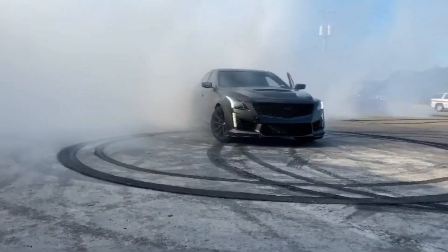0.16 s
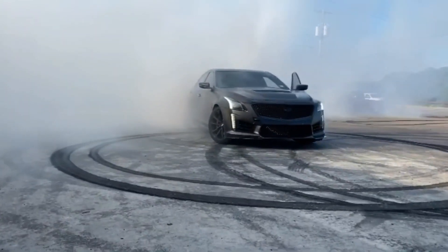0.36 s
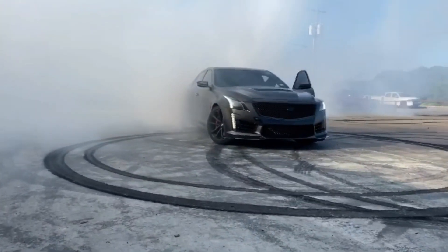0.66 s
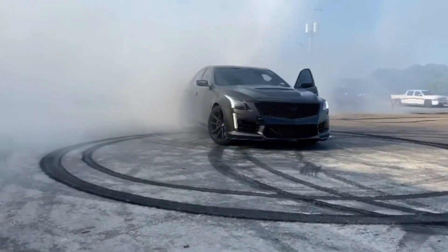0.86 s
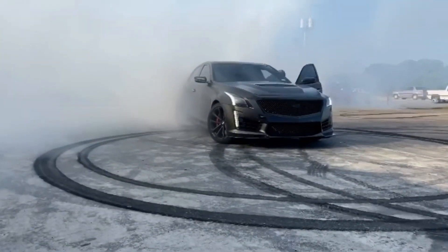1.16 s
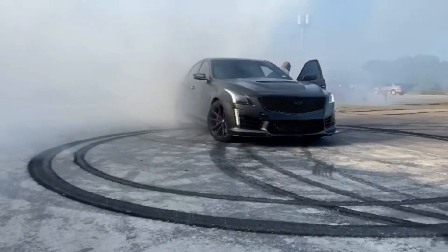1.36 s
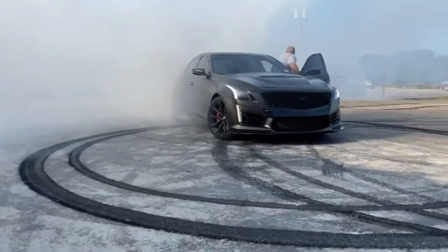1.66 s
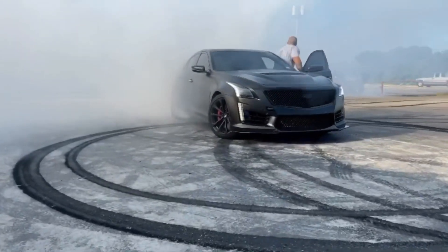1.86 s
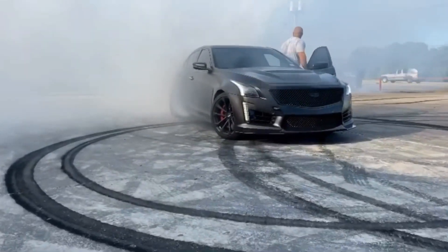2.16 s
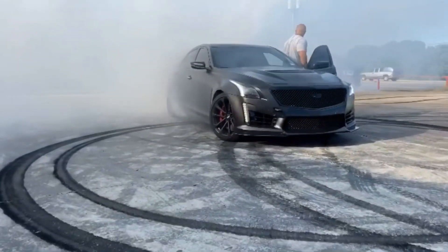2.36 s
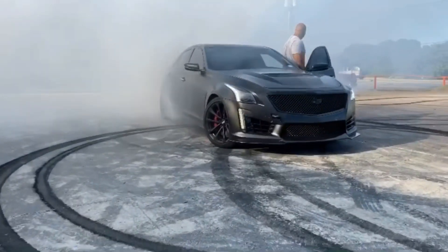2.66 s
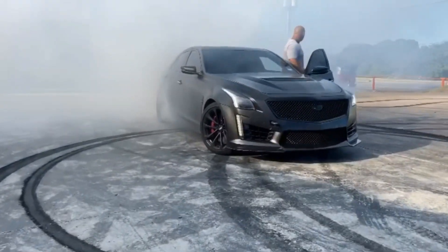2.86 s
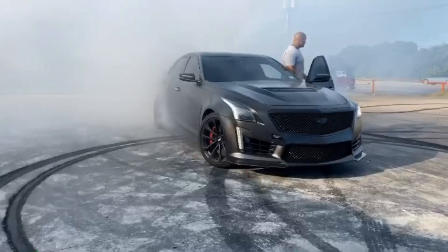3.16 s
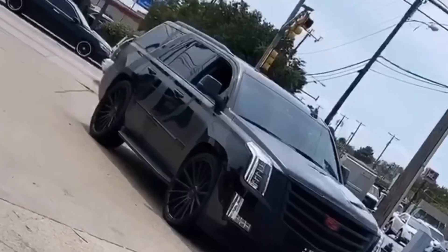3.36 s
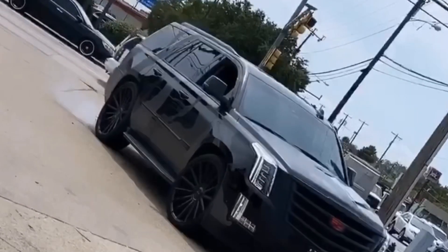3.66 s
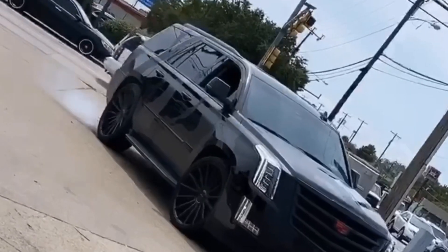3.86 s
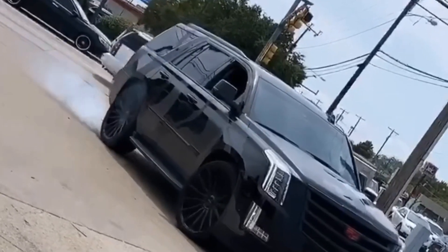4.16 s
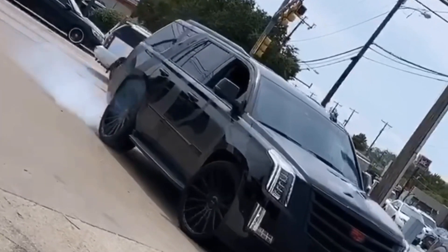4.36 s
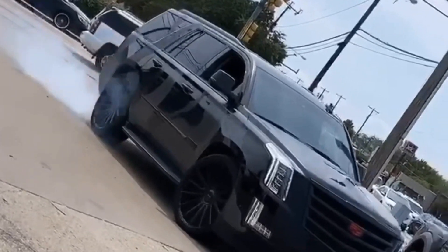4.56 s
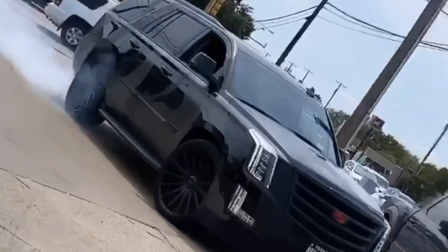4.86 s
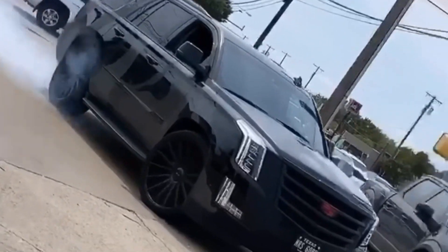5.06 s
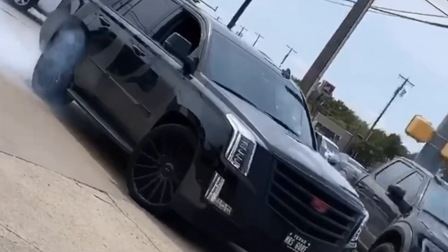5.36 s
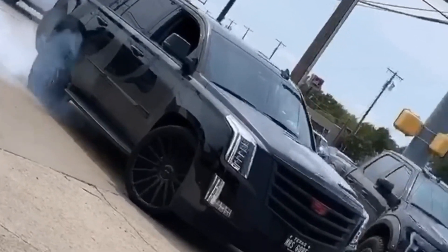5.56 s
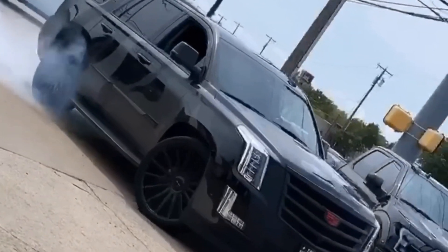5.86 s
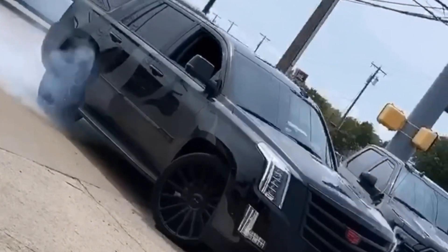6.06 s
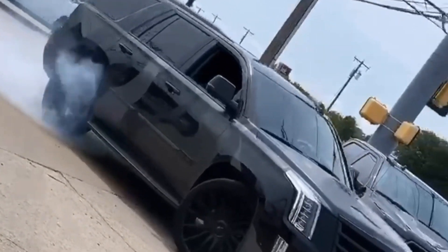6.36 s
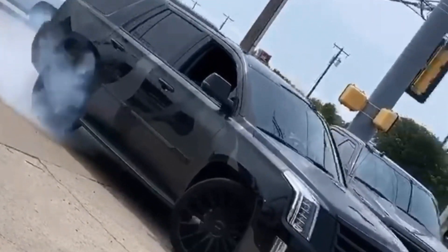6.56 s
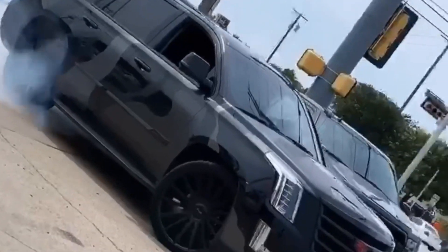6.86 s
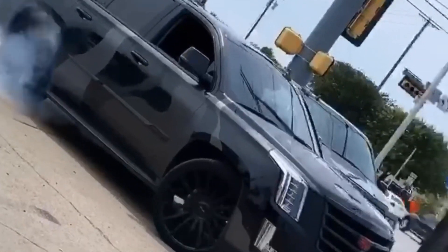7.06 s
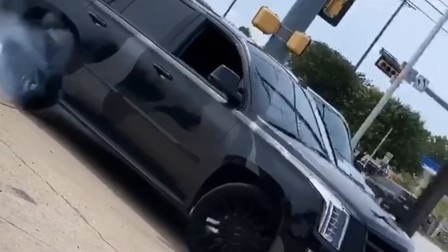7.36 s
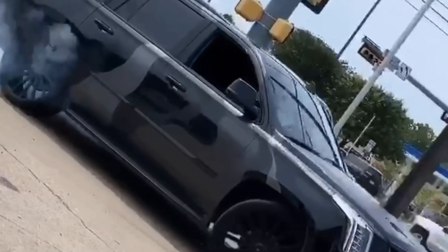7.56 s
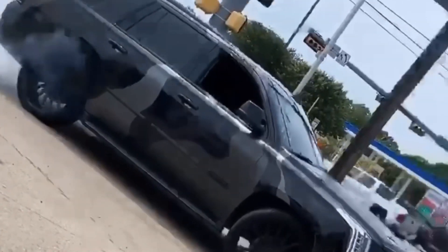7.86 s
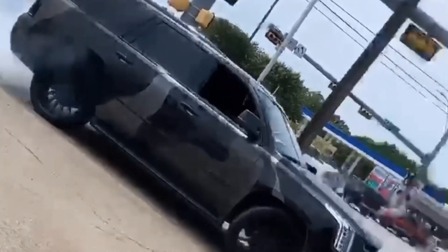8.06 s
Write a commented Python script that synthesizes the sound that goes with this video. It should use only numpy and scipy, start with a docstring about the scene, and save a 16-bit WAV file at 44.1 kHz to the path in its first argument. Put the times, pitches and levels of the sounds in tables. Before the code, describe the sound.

First a soft, bassy, lumpy idle in wide stereo, drawing nearer, with a few faint ticks. After a tiny gap, a loud, centred street burnout bursts in: rough tyre chirps around a rising, raspy V8 note, a crackling gear change with a sharp pitch drop, steady growling and hissing wheelspin, then throttle closed and a quiet low burble over faint street noise, with light hiss at the end.

```python
"""A V8 SUV does a burnout on a street: tyres chirp and squeal, revs climb, the gearbox shifts up, the wheels
spin on with a hiss, then the throttle closes to a deep burble. Engine: sine orders of the cycle rate plus
firing-pulsed noise; tyres: swept harmonic tones and filtered noise. Before it, and a short silence, a V8
saloon lopes at idle: uneven firing pulses ring its exhaust, with valve rustle and belt hum."""
import sys
import numpy as np
from scipy import signal
from scipy.fft import rfft, irfft
from scipy.io import wavfile
from scipy.ndimage import uniform_filter1d, minimum_filter1d, map_coordinates

SR = 44100
rng = np.random.default_rng(int(sys.argv[2]) if len(sys.argv) > 2 else 0)


def wrap_up_sound(samples):
    """Save the sound to the file named by the first command line argument, as 16-bit audio."""
    columns = np.atleast_2d(samples).T
    # keep every value between -1 and 1, then stretch to whole-number steps
    tamed = np.clip(columns, -1, 1)
    steps = np.round(tamed * 32767).astype(np.int16)
    wavfile.write(sys.argv[1], SR, steps)


N = 361821
T = np.arange(N) / SR
SALOON_END_S, SUV_START_S = 3.08, 3.242
TOP_HZ = 15750

# SUV engine speed. Each row: time in seconds, engine cycles in Hz.
SUV_REVS = [(3.25, 28.2), (3.42, 31), (3.93, 42.1), (4.22, 46.7), (4.38, 47.9), (4.52, 46.7), (4.7, 31.3),
            (4.79, 29.3), (5.1, 29.2), (5.44, 28.7), (5.98, 29.35), (6.274, 27.4), (6.458, 26.6),
            (6.6, 24.8), (6.78, 19.8), (6.93, 12), (7.07, 10.2), (7.27, 9.3), (7.5, 11), (7.68, 10.1),
            (8.2, 11.4)]
# Throttle, part open until about 5.3 s, then full, and closed at the end; each layer takes its own share of the
# dB. # Each row: time in seconds, level in dB.
THROTTLE = [(4.68, -4.5), (4.8, -3.5), (5.3, -3.5), (5.42, 0), (5.87, -0.5), (6.65, -3), (6.87, -14.5),
            (6.96, -29), (7.15, -31.5), (7.4, -37)]
# Strain at the launch, up the revs, at the upshift, as the tyres bite again and as it rolls on.
# Each row: start in seconds, end in seconds, then dB added to exhaust beat, rasp, tyre hiss, uneven combustion.
STRAINS = [(3.147, 3.574, 6.5, 6, 7, 11), (3.587, 4.524, 1.5, 4, 1.5, -1.5), (4.515, 4.722, 3.5, 7, 3.5, 8),
           (6.116, 6.925, 1, 0, -1, 6), (7.85, 8.4, 1.5, 2.5, 1.5, 2.5)]
STRAIN_EDGE_S = 0.045
# Levels at full throttle without strain.
BEAT_DB, ROUGH_DB, RASP_DB, HISS_DB = -1.7, -43.5, -27, -44.5
SPIN_HZ = 27.9  # below this cycle rate the wheelspin hiss, beat and roughness sink
FIRING_ORDER = 8  # firings per engine cycle
FLUTTER_DB = 1.2  # unsteadiness of the firing tone
# Pipe resonances the firing tone sweeps through. Each row: frequency in Hz, level in dB.
FIRING_PIPE = [(70, -16), (80, -16.5), (88, -16), (100, -23), (125, -31), (163, -23.5), (192, -32),
               (207, -25.5), (224, -28.5), (236, -38.5), (252, -23.5), (280, -20), (310, -28), (335, -37),
               (358, -26.5), (374, -25)]
# Orders filled in by the uneven firing of the two banks.
# Each row: multiple of the cycle rate, level in first gear in dB, level in second gear in dB.
BEAT_ORDERS = [(2, -5, -5), (3, 4, 3.5), (4, -2.5, -1.5), (5, 4, -2), (6, -5.5, 7.5), (7, 2.5, -1.5),
               (9, 10.5, 1.5), (10.03, 5.5, 8.5), (11, 11, 5), (12, -3, -17), (13, 1.5, 0.5), (14, 4.5, 1),
               (15, -7, 5), (16, 8, 6.5), (17, 6.5, -21), (18, 1, -1.5), (19, 2.5, 6.5), (20, 1.5, -18),
               (22, 3.5, -20), (23, 2, 1), (24, 3.5, 0.5), (26.1, 4, -0.5), (27, 0, 4.5), (28, 5.5, -2),
               (29, 8, 0.5), (32, 2, -3), (33, -15, -0.5), (35, -4, 3.5), (40, -11, 4.5)]
# Three blasts stand out in each engine cycle. Each row: place in the cycle from 0 to 1, relative size.
BLASTS = [(0, 1), (.345, .9), (.64, .8)]
# SUV exhaust response to the beat. Each row: frequency in Hz, level in dB.
SUV_PIPE = [(30, -62.5), (58, -36), (86, -30.5), (118, -40.5), (145, -40.5), (175, -35.5), (205, -35),
            (250, -54.5), (290, -39), (335, -48), (380, -40), (480, -48.5), (590, -51.5), (650, -51.5),
            (700, -38), (745, -51.5), (795, -37), (850, -47), (910, -37), (955, -51), (1010, -38),
            (1070, -45), (1130, -51.5), (1230, -44), (1400, -44.5)]
# Exhaust response to the rumble. Each row: frequency in Hz, level in dB.
RUMBLE_PIPE = [(35, -20.5), (55, 0.5), (110, -2), (145, 1.5), (180, -2.5), (215, 2), (245, -10.5),
               (290, -5.5), (450, -20.5)]
UPSHIFT_S, UPSHIFT_LENGTH_S = 4.66, 0.2
BARK_S, BARK_RISE_S, BARK_DB = 5.75, 0.08, 2.5  # as the load grows, the tenth and higher orders come forward
# Cylinders in firing order, used for both engines. Each row: strength in dB, lateness in firing intervals.
CYLINDERS = [(-2, 0), (1.5, 0.079), (1, -0.047), (1.5, 0.072), (-6, -0.021), (2.5, -.04), (-2.5, 0.078),
             (4, -0.042)]
# Weak or strong runs of firings. Each row: start in seconds, end in seconds, level change in dB.
STUMBLES = [(0.08, 0.178, -2.5), (0.563, 0.627, -1.5), (1.7, 1.97, 1), (2.042, 2.14, -2.5),
            (2.62, 2.78, 0.5), (2.788, 2.853, -5.5), (7.2, 7.318, -8), (7.373, 7.612, -10),
            (7.532, 7.567, -8), (7.8, 8.12, 1.5), (7.966, 8.054, -8.5), (8.125, 8.157, -13)]
STUMBLE_EDGE_S = .04
# Engine rasp response. Each row: frequency in Hz, level in dB.
RASP = [(200, -9), (420, 2), (590, -9.5), (700, -0.5), (800, 2), (920, 7), (1110, 4.5), (1280, -2.5),
        (1600, -1.5), (2050, -1), (2500, -5), (2950, -9.5), (3380, -25), (6000, -31.5)]
# Intake resonances. Each row: frequency in Hz, level in dB.
HOWL = [(640, -70), (830, -33), (895, -23.5), (938, -34.5), (975, -28), (997, -22.5)]
# Orders that howl. Each row: multiple of the cycle rate, level in dB.
HOWL_ORDERS = [(21, 0), (23, -7)]
HOWL_TOP_HZ = 1020
# Exhaust crackles through the upshift. Each row: start in seconds, noise envelope peak in dB before the ring.
POPS = [(4.561, -10), (4.583, -14), (4.597, -13), (4.619, -12), (4.635, -15), (4.656, -14), (4.679, -16)]
# Ring of a pop. Each row: frequency in Hz, level in dB.
POP_RING = [(150, -4), (340, 15.5), (590, 2), (910, 17), (1300, 10.5), (1900, 2), (2900, -27), (3500, -35)]
POP_DECAY_S = 0.0059
# Tyre squeals. Each row: start in seconds, length in seconds, first pitch in Hz, last pitch in Hz,
# level in dB, nominal octave level in dB relative to the tone.
SQUEALS = [(3.253, 0.14, 1005, 1035, -25, -10.5), (3.425, 0.11, 1018, 1000, -32.5, 10),
           (3.429, 0.088, 1103, 1083, -15.5, -13), (3.539, 0.088, 1051, 1042, -12, -10),
           (3.622, 0.06, 1050, 1052, -25.5, -4), (3.675, 0.035, 1052, 1050, -13.5, -10.5),
           (3.768, 0.026, 1100, 1085, -19, -20), (3.793, 0.044, 1046, 1022, -16.5, -12.5),
           (4.572, 0.032, 923, 900, -19.5, -17), (5.83, 0.24, 1497, 1490, -38, -21)]
# Harmonics 1 to 4 of a squeal. Each row: level offset in dB, flutter in dB.
SQUEAL_PARTS = [(-1.2, 1.4), (-2, 2.7), (-27.5, 3.8), (-31, 2.9)]
# Tread scrub as it breaks loose. Each row: frequency in Hz, level in dB.
SKID = [(950, -7), (1270, 5.5), (1550, -7), (2150, -3.5), (2450, -7), (2900, -16)]
SKID_START_S, SKID_END_S, SKID_DB = 3.34, 3.57, -26.5
# Hiss of the spinning tyres. Each row: frequency in Hz, level in dB.
HISS = [(2500, 0.5), (3400, -2.5), (4000, -5.5), (5370, -5), (5910, -1), (6460, -5), (6970, -4),
        (8500, -8.5), (9690, -11), (10700, -24), (11700, -17), (15500, -21.5)]
# Thin hiss as the SUV rolls on. Each row: frequency in Hz, level in dB.
SIZZLE = [(4800, -21), (6000, 2), (7000, -5), (8800, 3), (9700, -9.5), (10600, -13), (15000, -12)]
# Soft drone as the SUV rolls on. Each row: frequency in Hz, level in dB.
DRONE = [(600, -19), (830, 10), (950, -9), (1250, -16)]
ROLL_ON_S, ROLL_RISE_S, SIZZLE_DB, DRONE_DB = 7.73, 0.22, -65, -58

# Saloon engine speed at idle. Each row: time in seconds, engine cycles in Hz.
LOPE = [(0, 6.68), (.35, 6.53), (.7, 6.53), (1.1, 6.76), (2.65, 6.6), (3.1, 6.72)]
# Saloon exhaust response. Each row: frequency in Hz, level in dB.
SALOON_PIPE = [(25, -55), (40, -12), (52, -7), (68, 3), (84, -0.5), (94, 2), (106, 6.5), (122, 2), (143, 3),
               (162, -8), (230, -20), (400, -22), (800, -45)]
# Engine bay response. Each row: frequency in Hz, level in dB.
BAY = [(170, -11), (350, -7), (470, -5), (780, -6.5), (1050, -15), (1900, -18), (2500, -23.5),
       (3000, -29.5), (4500, -29.5), (5600, -36), (8500, -39.5), (10500, -31), (13000, -45)]
# Belt drive tones. Each row: frequency in Hz, level in dB.
BELT = [(322, 2), (440, -2), (458, -1.5)]
# Levels at 0 s; the saloon grows louder as the listener walks up to it.
SALOON_DB, BAY_DB, BELT_DB = -39, -56, -64.5
APPROACH_DB_PER_S, BAY_DB_PER_S = 2, 2.5
# Faint ticks by the saloon. Each row: start in seconds, noise envelope peak in dB before the ring.
TICKS = [(1.9718, -50), (2.7544, -46), (2.9155, -47), (2.9524, -47)]
# Ring of a tick. Each row: frequency in Hz, level in dB.
TICK_RING = [(400, 7), (700, 4), (2000, -9), (4200, -5), (5500, -9)]
TICK_DECAY_S = .004

# Street background. Each row: frequency in Hz, level in dB.
STREET = [(30, 7.5), (100, 4), (200, -6), (330, -7), (480, -10.5), (580, -4), (700, -12), (860, -6),
          (1200, -18.5), (2500, -25.5), (4000, -58)]
STREET_DB = -51.0


def suv():
    """Engine, tyres and street in mono; throttle, revs and strain drive the engine and hiss levels."""
    cycle_hz, throttle_db = curves(SUV_REVS) + curves(THROTTLE)
    boom_db, snarl_db, scrub_db, uneven_db = strains()
    slowing_db = 20 * np.log10(np.minimum(cycle_hz / SPIN_HZ, 1))
    cycle = np.cumsum(cycle_hz) / SR
    firing_db = response(FIRING_PIPE, FIRING_ORDER * cycle_hz) + 0.39 * throttle_db
    firing_db = firing_db + FLUTTER_DB * walk(30) + stumbles()
    beat_db = BEAT_DB + boom_db + 0.35 * throttle_db + 1.1 * slowing_db
    rough_db = ROUGH_DB + uneven_db + .45 * slowing_db
    rasp_db = RASP_DB + throttle_db + snarl_db
    hiss_db = HISS_DB + scrub_db + 0.43 * throttle_db + 1.25 * slowing_db
    # uneven burns shake the crank, which smears the upper lines
    turn = 2 * np.pi * (cycle + undb(.5 * rough_db - 32) * walk(60))
    engine = exhaust(cycle, turn, firing_db, beat_db, rough_db, throttle_db)
    engine = engine + intake(cycle, cycle_hz, turn, rasp_db)
    crackle = bursts(POPS, POP_DECAY_S, POP_RING)
    return engine + crackle + squeal() + skid() + tyre_hiss(hiss_db) + roll_on() + street()


def exhaust(cycle, turn, firing_db, beat_db, rough_db, throttle_db):
    """Firing tone, the two banks' uneven beat through the pipes, and rumble; beat duller off throttle."""
    tone = -np.sqrt(2) * np.cos(FIRING_ORDER * turn)
    beat = colour(np.sqrt(2) * bank_beat(turn, throttle_db), SUV_PIPE)
    return beat * undb(beat_db) + tone * undb(firing_db) + rumble(cycle) * undb(rough_db)


def bank_beat(turn, throttle_db):
    """Sum of engine orders whose phases line the low ones up on three blasts a cycle."""
    shifted = np.clip((T - UPSHIFT_S) / UPSHIFT_LENGTH_S + .5, 0, 1)
    bark_db = BARK_DB * np.clip((T - BARK_S) / BARK_RISE_S + .5, 0, 1)
    flicker_db = 1.5 - .6 * shifted  # more flicker before the upshift
    beat = 0
    for multiple, first_db, second_db in BEAT_ORDERS:
        order = round(multiple)
        db = first_db + shifted * (second_db - first_db) + bark_db * (multiple > 10)
        db = db + 0.0086 * multiple * throttle_db
        db = db + flicker_db * (1 + multiple / 20) * walk(24)
        lead = np.angle(sum(size * np.exp(-2j * np.pi * order * place) for place, size in BLASTS))
        trail = .011 * multiple ** 2  # the pipe lets the high orders trail behind
        beat = beat - undb(db) * np.cos(order * turn + lead - trail)
    return beat


def rumble(cycle):
    """No two burns are alike: random-sized pulses through silencer and pipe rumble between the lines."""
    burns = firings(cycle, scatter_db=-0.5, jitter=.05) * noise() / np.sqrt(np.gradient(cycle))
    return unit(colour(silencer(burns), RUMBLE_PIPE))


def intake(cycle, cycle_hz, turn, rasp_db, count=4):
    """Grainy noise rasp pulsing with the firings; orders howl where they meet the intake resonances."""
    gate = puffs(cycle, depth=.11, lump=.1) * undb(1.3 * walk(300))
    # each engine cycle partly repeats the ones before it, so wavering partials come and go
    share = .7
    fresh = noise()
    gas = sum(share ** k * np.interp(cycle - k, cycle, fresh) for k in range(count))
    rasp = unit(colour(gas * gate, RASP))
    howl = 0
    for order, db in HOWL_ORDERS:
        hz = order * cycle_hz
        level = undb(db + response(HOWL, hz) + walk(70)) * (hz < HOWL_TOP_HZ)
        howl = howl + np.sin(round(order) * turn) * level
    return rasp * undb(rasp_db) + np.sqrt(2) * howl


def squeal(edge_s=.018, sag_db=3.0):
    """Tread sticks and slips in short swelling bursts: rough tones, each overtone fluttering on its own."""
    out = np.zeros(N)
    wobble = 1 + .011 * walk(330) + .0035 * walk(70)
    parts = [undb(part_db + flutter_db * walk(170)) for part_db, flutter_db in SQUEAL_PARTS]
    for start, length, first_hz, last_hz, db, octave_db in SQUEALS:
        i = np.flatnonzero((T > start - edge_s) & (T < start + length + edge_s))
        t = T[i] - start
        hz = np.interp(t, [0, length], [first_hz, last_hz]) * wobble[i]
        turn = 2 * np.pi * np.cumsum(hz) / SR
        edges = np.clip(np.minimum(t, length - t) / edge_s + .5, 0, 1)
        grip = edges * undb(-sag_db * (2 * t / length - 1) ** 2)
        bite = undb(0.45 * (db + 8.0))  # a softer slip has weaker high overtones
        sizes = [1, undb(octave_db), bite ** 2, bite ** 3]
        wave = sum(part[i] * size * np.sin(k * turn) for k, (part, size) in enumerate(zip(parts, sizes), 1))
        out[i] += np.sqrt(2) * wave * grip * undb(db)
    return out + scatter(out)


def scatter(x):
    """Nearby cars and walls scatter the squeals and join them up: a decaying noise tail."""
    tail = (noise() * np.exp(-T / .025))[:SR // 5]
    return signal.fftconvolve(x, tail / np.linalg.norm(tail))[:N] * undb(-13)


def skid():
    """Tread scrubs as it breaks loose: a burst of filtered noise."""
    return unit(colour(noise(), SKID)) * span(SKID_START_S, SKID_END_S, STRAIN_EDGE_S) * undb(SKID_DB)


def tyre_hiss(hiss_db):
    """Spinning tyres hiss: filtered noise with a fine flicker."""
    return unit(colour(noise() * undb(0.47 * walk(120)), HISS)) * undb(hiss_db)


def roll_on():
    """A thin flickering hiss and a soft drone, both filtered noise, rise as the SUV rolls on."""
    rolling = np.clip((T - ROLL_ON_S) / ROLL_RISE_S, 0, 1)
    sizzle = unit(colour(noise(), SIZZLE)) * undb(SIZZLE_DB + 2.5 * walk(22))
    drone = unit(colour(noise(), DRONE)) * undb(DRONE_DB)
    return (sizzle + drone) * rolling


def saloon():
    """Idling car in stereo: exhaust, engine bay and belt drive, growing louder, with faint ticks."""
    cycle = np.cumsum(curves(LOPE)[0]) / SR
    near_s = np.minimum(T, SALOON_END_S)
    front = (engine_bay(cycle) + belt_drive()) * undb(BAY_DB_PER_S * near_s)
    return saloon_exhaust(cycle, near_s) + front + bursts(TICKS, TICK_DECAY_S, TICK_RING)


def saloon_exhaust(cycle, near_s):
    """Lumpy firing pulses, smeared by the silencer, ring the exhaust pipe."""
    pulses = silencer(firings(cycle, scatter_db=2.5, jitter=0.029), delay_s=0.00903, feedback=0.6)
    pipes = unit(colour(pulses, SALOON_PIPE))
    pipes = pipes * undb(SALOON_DB + APPROACH_DB_PER_S * near_s + stumbles())
    # left lags a little, and is louder as the car comes near
    lag_s = .00038
    pan_db = np.interp(T, [1.2, 2.7], [.2, 1.9])
    return np.array([np.interp(T - lag_s, T, pipes) * undb(pan_db / 2), pipes * undb(-pan_db / 2)])


def engine_bay(cycle):
    """Valve rustle: noise pulsed by the gas flow, arriving from all sides, so independent per channel."""
    valves = puffs(cycle, depth=0.056, lump=0.074)
    rustle = np.array([unit(colour(noise() * valves, BAY)) for _ in range(2)])
    return rustle * undb(BAY_DB + 0.64 * walk(11))


def belt_drive():
    """Belt hum: sines wavering in pitch and level."""
    hum = 0
    for hz, db in BELT:
        turn = 2 * np.pi * np.cumsum(hz * (1 + 0.0056 * walk(12))) / SR
        hum = hum + undb(db + 1.4 * walk(6.65)) * np.sin(turn)
    return hum * undb(BELT_DB)


def street():
    """Street background: filtered noise with a slowly wandering level."""
    return unit(colour(noise(), STREET)) * undb(STREET_DB + walk(3.6))


def firings(cycle, scatter_db, jitter, count=8):
    """One pulse per cylinder and engine cycle, each a little off in size and time."""
    k = np.arange(int(cycle[-1] * count))
    db, late = np.array(CYLINDERS)[k % count].T
    chance = rng.standard_normal((len(k), 2))
    at = np.interp((k + late + jitter * chance[:, 0]) / count, cycle, np.arange(N))
    return np.bincount(at.astype(int), undb(db + scatter_db * chance[:, 1]), N)[:N]


def puffs(cycle, depth, lump, count=8):
    """Gas flow swells at every firing, and in a lump three times a cycle."""
    return np.exp(depth * np.cos(2 * np.pi * count * cycle) + lump * np.cos(2 * np.pi * 3 * cycle))


def silencer(x, delay_s=.013, feedback=.5):
    """Sound runs to and fro in the silencer: an all-pass that smears each pulse but keeps its colour."""
    size = 2 ** 19
    trip = np.exp(-2j * np.pi * np.arange(size // 2 + 1) * SR / size * delay_s)
    return irfft(rfft(x, size) * (trip - feedback) / (1 - feedback * trip))[:N]


def bursts(rows, decay_s, points):
    """Sharp bursts of noise that die away, one per (s, dB) row, through a (Hz, dB) response."""
    level = sum((T >= start) * np.exp(-np.abs(T - start) / decay_s) * undb(db) for start, db in rows)
    return colour(level * noise(), points)


def stumbles():
    """Dips and swells in dB where a few firings come out weak or strong."""
    return sum(db * span(start, end, STUMBLE_EDGE_S) for start, end, db in STUMBLES)


def strains():
    """Extra dB of exhaust beat, rasp, tyre hiss and uneven combustion while the engine strains."""
    return sum(np.outer(dbs, span(start, end, STRAIN_EDGE_S)) for start, end, *dbs in STRAINS)


def span(start, end, edge_s):
    """Rise, hold at 1, fall."""
    return np.clip(np.minimum(T - start, end - T) / edge_s + .5, 0, 1)


def response(points, hz):
    """Level in dB of a tone that sweeps through a (Hz, dB) response."""
    return np.interp(hz, *np.transpose(points))


def colour(x, points):
    """Causal minimum-phase filter with a (Hz, dB) response that falls away beyond its ends."""
    size = 2 ** 19
    hz, db = np.transpose(points)
    octave = np.log2(np.maximum(np.arange(size // 2 + 1) * SR / size, 1))
    beyond = np.abs(octave - np.clip(octave, np.log2(hz[0]), np.log2(hz[-1])))
    gain_db = np.interp(octave, np.log2(hz), db) - 20 * np.minimum(beyond, 2)
    # fold the cepstrum to make the response causal
    cepstrum = irfft(np.log(undb(gain_db)))
    cepstrum[1:size // 2] *= 2
    cepstrum[size // 2 + 1:] = 0
    return irfft(rfft(x, size) * np.exp(rfft(cepstrum)))[:N]


def noise():
    """White noise."""
    return rng.standard_normal(N)


def walk(rate_hz):
    """Smooth random curve with a spread near 1, through rate_hz random points a second."""
    points = rng.standard_normal(4096)
    coarse_s = T[::16]
    return np.interp(T, coarse_s, map_coordinates(points, [coarse_s * rate_hz], order=3, mode="wrap"))


def curves(table):
    """The columns of a timed table, one value a sample."""
    s, *columns = np.transpose(table)
    return [np.interp(T, s, c) for c in columns]


def undb(db):
    """Decibels to gain."""
    return 10 ** (np.asarray(db) / 20)


def unit(x):
    """Scale to rms 1."""
    return x / np.sqrt(np.mean(x ** 2))


def scene():
    """First the saloon, a short silence, then the SUV."""
    first = np.clip((SALOON_END_S - T) / 0.0062, 0, 1)
    second = np.clip((T - SUV_START_S) / 0.00039, 0, 1)
    return saloon() * first + suv() * second


def record(dry):
    """A limiter holds the loudest peaks, then a steep low-pass cuts the top."""
    ceiling = .51
    gain = np.minimum(1, ceiling / (np.abs(dry).max(axis=0) + 1e-9))
    gain = uniform_filter1d(minimum_filter1d(gain, size=200), size=200)
    low_pass = signal.ellip(10, .2, 70, TOP_HZ, fs=SR, output="sos")
    return signal.sosfilt(low_pass, dry * gain)


dry = scene()
out = record(dry)
wrap_up_sound(out)
```